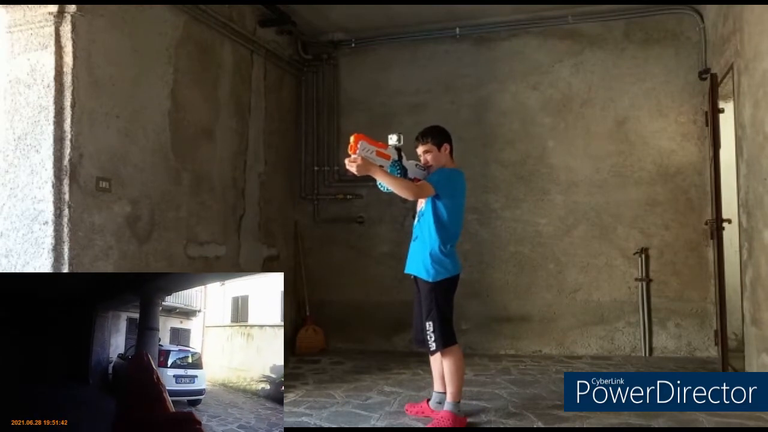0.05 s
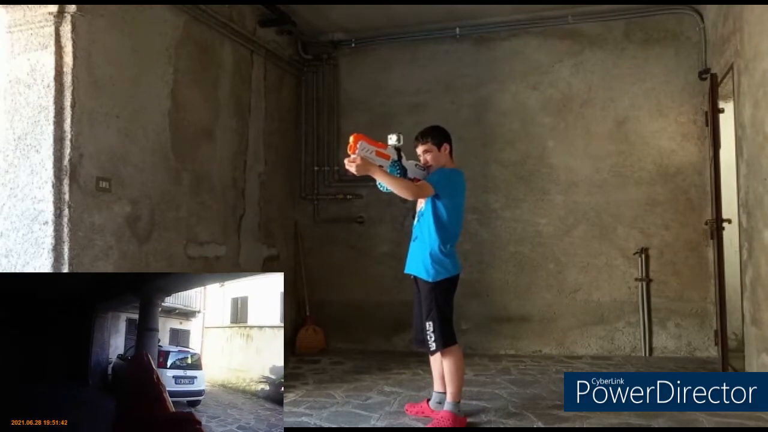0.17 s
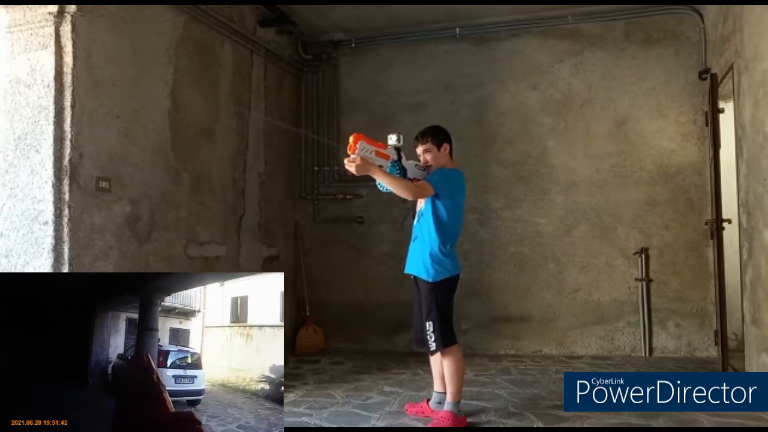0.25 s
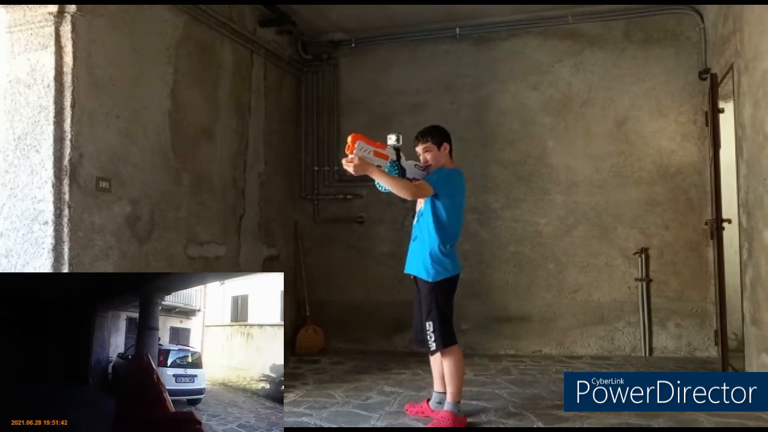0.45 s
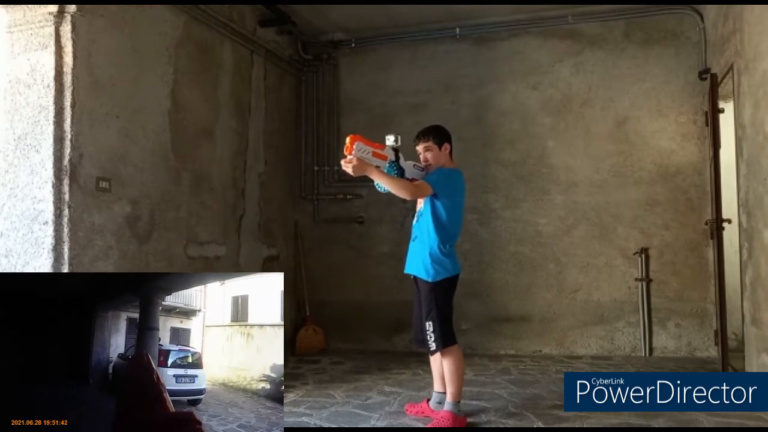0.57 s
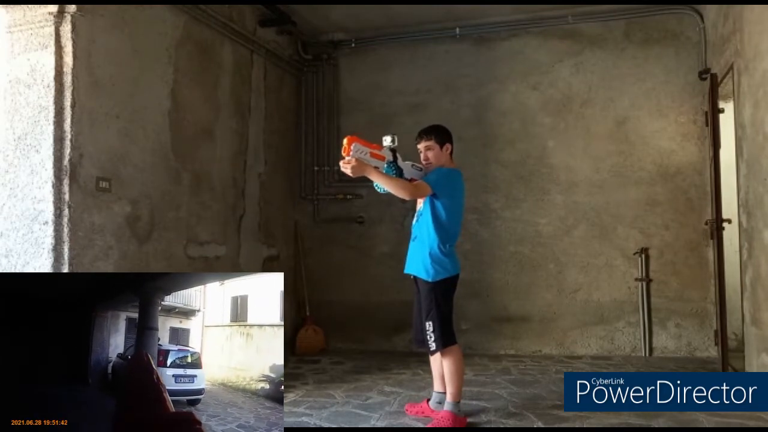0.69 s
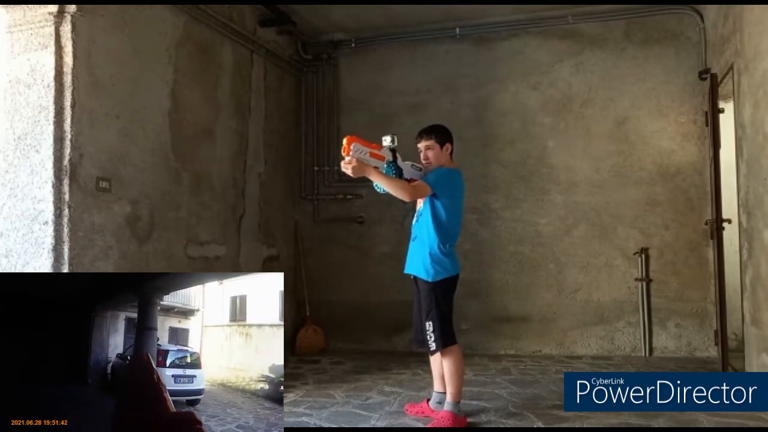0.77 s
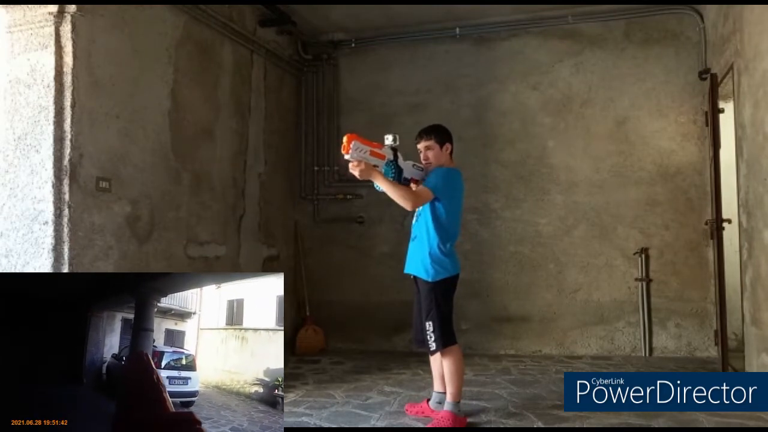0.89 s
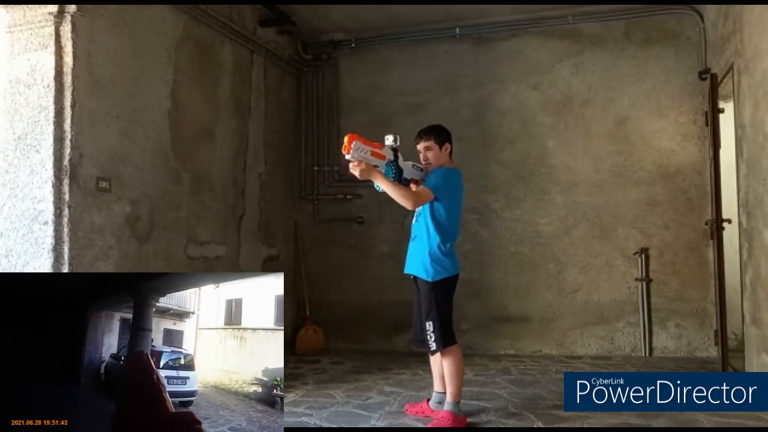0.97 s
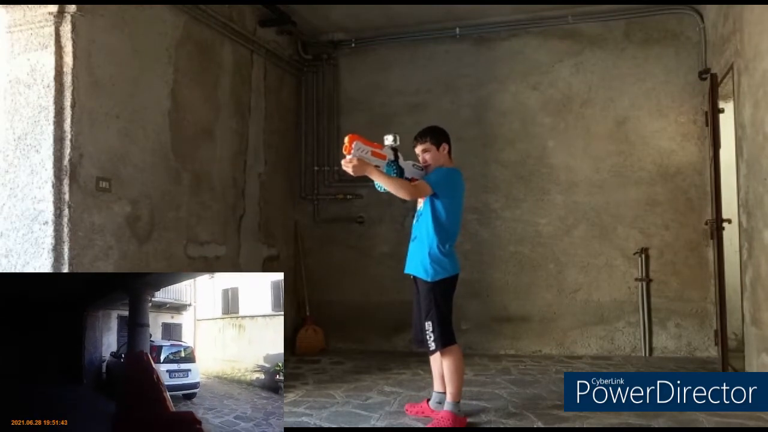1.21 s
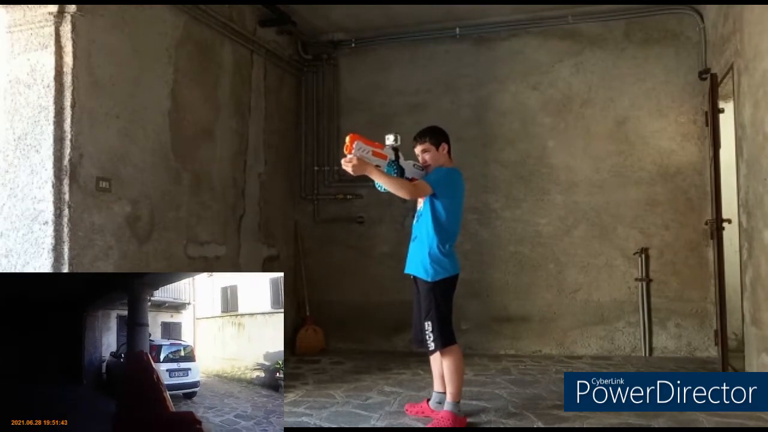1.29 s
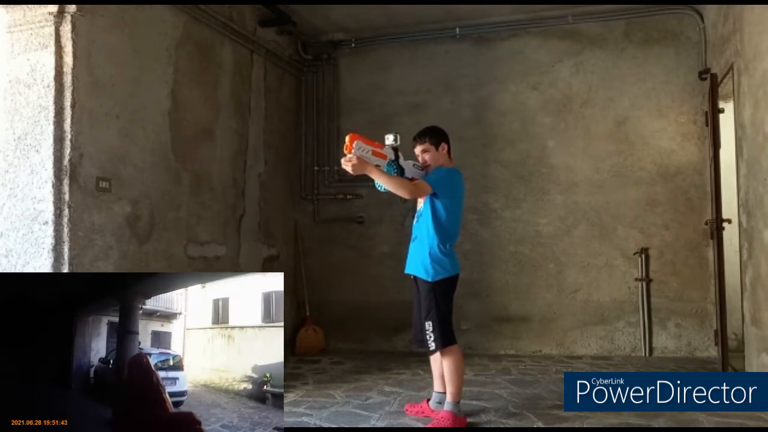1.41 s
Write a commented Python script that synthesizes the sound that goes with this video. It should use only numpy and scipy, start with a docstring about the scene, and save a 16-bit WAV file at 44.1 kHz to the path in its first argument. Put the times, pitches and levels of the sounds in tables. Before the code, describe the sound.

A toy blaster fires one loud, sharp pop at about 0.2 seconds, just after a faint trigger rub, slightly to the right. The stone garage rings on with a low boom. From 0.75 to 0.9 seconds it is cocked: a small ping, rubbing and quick plastic clacks. A lighter knock follows near 1.2 seconds. Faint outdoor rumble and machine hum lie underneath as the echo fades.

```python
"""A spring-powered toy blaster in a bare stone garage, a little right of a stereo microphone pair.
Over faint outdoor rumble and a far machine's hum, the trigger rubs and clicks; then the plunger slams
home and the barrel pops. Half a second later the toy is primed again: a latch pings, the slide rubs,
the rubber seal groans and plastic parts knock. The hard walls ring on after every sound, longest in
the bass, and the level sinks at the close."""
import sys
import numpy as np
from scipy import signal
from scipy.fft import rfft, irfft
from scipy.io import wavfile
from scipy.ndimage import uniform_filter1d

SR = 44100
rng = np.random.default_rng(int(sys.argv[2]) if len(sys.argv) > 2 else 0)


def persist_wave(psi):
    """Save psi, clipped to +-1, as 16-bit WAV."""
    counts = np.round(np.clip(psi, -1, 1) * 32767).astype(np.int16)
    wavfile.write(sys.argv[1], SR, np.atleast_2d(counts).T)


N = 63945
SHOT_S = 0.2275


def undb(db):
    """Decibels to gain."""
    return 10 ** (np.asarray(db) / 20)


def pan(left_minus_right_db):
    """Gains at the left and right microphones."""
    return undb([[left_minus_right_db / 2], [-left_minus_right_db / 2]])


def value_at(table, hz):
    """A table's value on a log-frequency axis."""
    points_hz, values = np.array(table).T
    return np.interp(np.log(np.maximum(hz, 1)), np.log(points_hz), values)


def since(start_s):
    """Seconds since a moment, for every sample."""
    return np.arange(N) / SR - start_s


def die_away(start_s, t60_s):
    """Sudden onset, then a fall of 60 dB in t60_s."""
    t = since(start_s)
    return (t >= 0) * undb(-60 * np.abs(t) / t60_s)


def unit_energy(x):
    """Scale to an energy of one."""
    return x / np.sqrt(np.sum(x ** 2) + np.finfo(float).tiny)


def resonances(peaks, hz):
    """Gain of a set of resonant peaks and dips, one between them."""
    power = 1 + sum((undb(db) ** 2 - 1) / (1 + (2 * (hz - centre_hz) / width_hz) ** 2) ** 1.5
                    for centre_hz, width_hz, db in peaks)
    return np.sqrt(power)


def colour(x, spectrum, peaks, tilt_db_per_octave=0):
    """Causal filter with the given spectrum, resonances and tilt."""
    hz = np.fft.rfftfreq(2 * N, 1 / SR)
    octaves = np.log2(np.maximum(hz, spectrum[0][0]))
    gain = undb(value_at(spectrum, hz) + tilt_db_per_octave * octaves) * resonances(peaks, hz)
    # minimum phase: nothing rings before the blow
    cepstrum = irfft(np.log(gain))
    cepstrum[1:N] *= 2
    cepstrum[N + 1:] = 0
    return irfft(rfft(x, 2 * N) * np.exp(rfft(cepstrum)))[:N]


def ring(start_s, modes):
    """Decaying modes set off by one blow."""
    t = since(start_s)
    return sum(undb(db) * unit_energy(die_away(start_s, t60_s) * np.sin(2 * np.pi * hz * t))
               for hz, db, t60_s in modes)


def rattle(start_s, decay_s):
    """A brief rattle of contacts with an even spectrum: it holds for a moment, then dies."""
    t = since(start_s)
    envelope = (t >= 0) * np.minimum(np.exp(1 - np.abs(t) / decay_s), 1)
    contacts = rng.standard_normal(N) * envelope
    for _ in range(4):
        flat_spectrum = np.exp(1j * np.angle(rfft(contacts)))
        contacts = irfft(flat_spectrum, N) * envelope ** 0.25
    return contacts


def diffuse_field():
    """Spectrum of noise from all around, alike at both microphones in the bass."""
    # likeness of left and right: frequency_hz, correlation (0-1)
    likeness = [(100, 0.94), (300, 0.89), (700, .35), (1400, 0), (12000, 0)]
    alike = np.clip(value_at(likeness, np.fft.rfftfreq(N, 1 / SR)), 0, 1)
    mid, side = rfft(rng.standard_normal((2, N)))
    return (np.sqrt(1 + alike) * mid + np.sqrt(1 - alike) * side * np.array([[1], [-1]])) / np.sqrt(2)


def outdoors(air_db=-63.5, hum_db=-68.5, hum_hz=436):
    """Faint outdoor rumble with a far machine's hum."""
    # colour of the distant air: frequency_hz, level_db
    air_spectrum = [(18, -44), (30, -19), (320, -10.5), (437, -13), (472, -4), (567, -22), (612, -22),
                    (1110, -29), (10700, -56), (15000, -40.5)]
    air = irfft(diffuse_field() * undb(value_at(air_spectrum, np.fft.rfftfreq(N, 1 / SR))), N)
    hum = np.sqrt(2) * np.sin(2 * np.pi * hum_hz * since(0))
    return undb(air_db) * air / air.std() + undb(hum_db) * hum


def garage(build_s=0.0013, wall_cutoff_hz=3000):
    """Response of the room: a few wall echoes and a dense tail whose bass lasts longest."""
    # hollow colour of the garage: centre_hz, width_hz, gain_db
    hollow = [(598, 34, 9)]
    # reverberation time: frequency_hz, t60_s
    room_t60 = [(70, 2.43), (250, 1.63), (500, 1.445), (1000, 0.87), (2000, 1.088), (4200, 0.78),
                (6000, 0.65), (9000, .5), (15000, 0.28)]
    # first reflections off the walls: delay_s, left_db, right_db
    walls = [(.0035, -18.5, -8), (.0165, -7.5, -32), (.024, -25, -28), (.030, -14, -10)]
    hz = np.fft.rfftfreq(N, 1 / SR)
    field = diffuse_field() * resonances(hollow, hz) * pan(-0.5)
    centres_hz = np.geomspace(50, 16000, 22)
    tail = 0
    for centre_hz, band_weights in zip(centres_hz, np.eye(len(centres_hz))):
        band = irfft(field * value_at(np.c_[centres_hz, band_weights], hz), N)
        tail = tail + band * die_away(0, value_at(room_t60, centre_hz))
    tail *= (1 - np.exp(-since(0) / build_s)) * np.sqrt(20 / SR)
    echoes = np.zeros((2, N))
    for delay_s, left_db, right_db in walls:
        echoes[:, int(delay_s * SR)] += undb([left_db, right_db])
    return tail + signal.sosfilt(signal.butter(1, wall_cutoff_hz, fs=SR, output="sos"), echoes)


def standing_waves():
    """The shot raises standing waves between the walls, the same at both microphones."""
    # modes of the garage: pitch_hz, level_db, t60_s
    room_modes = [(77.8, -4.5, 2.0), (127, -8.5, 2.2), (216.7, 2.5, 1.85), (257.3, 0, 2.16),
                  (558.5, 1, 3.2), (1229, 0, 1.2)]
    return ring(SHOT_S, room_modes)


def seal_groan(roughness=0.046):
    """The plunger's rubber seal shudders briefly along its tube."""
    # course of the groan: time_s, pitch_hz, level_db
    course = [(0.756, 268, -56), (.781, 279.3, -34), (.80, 293.4, -36), (0.834, 280.5, -33.5),
              (.87, 284, -52), (0.891, 272, -43)]
    times_s, hz, db = np.array(course).T
    t = since(0)
    waver = uniform_filter1d(rng.standard_normal(N), size=200)
    pitch_hz = np.interp(t, times_s, hz) * (1 + roughness * waver / waver.std())
    envelope = np.interp(t, times_s, undb(db), left=0, right=0)
    return np.sqrt(2) * np.sin(2 * np.pi * np.cumsum(pitch_hz) / SR) * envelope


def slide_rub(slips_per_s=1500):
    """Tiny slips of plastic along its rail, swelling or easing through each stroke."""
    # strokes of trigger and slide: start_s, length_s, level_db, swell_db
    strokes = [(0.125, 0.11, -74, 26), (.758, 0.034, -43, -5), (.8, 0.061, -41, -7),
               (1.008, 0.044, -49, -14), (1.122, 0.107, -52.5, 4)]
    # colour of the rubbing: frequency_hz, level_db
    rub_spectrum = [(60, -32), (300, -26), (420, 2.5), (720, 8.5), (1100, -1.5), (1700, 8), (3500, -8.5),
                    (8000, -13), (16000, -21)]
    # resonances of the rail: centre_hz, width_hz, gain_db
    rail = [(887, 80, 7.5), (1610, 69, 4.5)]
    slips = rng.standard_normal(N) * (rng.random(N) < slips_per_s / SR)
    rubbing = colour(slips, rub_spectrum, rail)
    effort = 0
    for start_s, length_s, db, swell_db in strokes:
        along = np.clip(since(start_s) / length_s, 0, 1)
        soft_ends = np.minimum(10 * along * (1 - along), 1)
        effort = effort + undb(db + swell_db * (along - 0.5)) * soft_ends
    return effort * rubbing / rubbing.std()


def latch_ping(start_s=0.7515):
    """The latch spring rings as priming begins."""
    # modes of the spring: pitch_hz, level_db, t60_s
    spring_modes = [(2754, -16, 0.14), (7570, -22.5, 0.014)]
    return ring(start_s, spring_modes)


def knock(start_s, level_db, decay_s, tilt_db_per_octave):
    """A short clatter of plastic on plastic."""
    # colour of the plastic body: frequency_hz, level_db
    plastic = [(60, -38), (280, 1.5), (420, -2.5), (720, 1), (1000, 3.5), (1600, 1.5), (2500, -3),
               (4300, -3), (6000, -9), (9000, -6.5), (16000, -11.5)]
    # resonances of the shell: centre_hz, width_hz, gain_db
    shell = [(917, 47, 6.5), (1307, 220, 1.5), (1780, 83, -7), (8040, 1500, 3)]
    clatter = colour(rattle(start_s, decay_s), plastic, shell, tilt_db_per_octave)
    return undb(level_db) * unit_energy(clatter)


def shot(level_db=12, rush_rise_s=0.0022, rush_to_crack_db=-13.5):
    """Air rushes ahead, the plunger cracks against its stop and the barrel rings."""
    # colour of the plunger's crack: frequency_hz, level_db
    crack_spectrum = [(30, -25), (50, -22), (75, -3), (200, 1), (450, -1), (750, 0.5), (1100, 7.5),
                      (1600, 0), (2100, 0), (2600, -9.5), (3500, -18), (4900, -12.5), (6000, -14.5),
                      (8500, -7.5), (12000, -14.5), (16000, -20)]
    # resonances of the barrel: centre_hz, width_hz, gain_db
    barrel = [(1053, 140, 2), (1241, 82, 10), (1506, 162, 14), (2940, 300, 7), (4200, 410, 17.5)]
    t = since(SHOT_S)
    rush = unit_energy(rng.standard_normal(N) * (t < 0) * np.exp(-np.abs(t) / rush_rise_s))
    crack = unit_energy(rattle(SHOT_S, decay_s=0.0033))
    pop = colour(crack + undb(rush_to_crack_db) * rush, crack_spectrum, barrel)
    return undb(level_db) * unit_energy(pop)


def scene():
    """Each sound of the toy reaches the two microphones directly and by way of the walls."""
    # knocks of trigger and slide: start_s, level_db, decay_s, tilt_db_per_octave, room_db
    knocks = [(.18, -45.5, 0.0095, -0.5, 7), (0.7535, -14.5, 0.0028, -2.5, 1),
              (0.8036, -21, 0.0057, -2, 18), (0.845, -13.5, 0.0024, 1, 11.5),
              (0.8649, -3, 0.0034, -0.5, 3.5), (0.8769, 1, .005, 0.68, 8), (1.1773, -12.5, .005, 0.7, 9)]
    # each sound with its room_db, the gain into the reverberation
    sounds = [(shot(), 10.5),
              (knock(SHOT_S, level_db=-3, decay_s=0.00039, tilt_db_per_octave=-0.5), 0),  # the shot's snap
              (latch_ping(), -0.5),
              (slide_rub(), 4),
              (seal_groan(), -14.5)]
    sounds += [(knock(*blow), room_db) for *blow, room_db in knocks]
    direct = sum(sound for sound, _ in sounds) * pan(-3.5)
    into_room = sum(sound * undb(room_db) for sound, room_db in sounds)
    reverberation = signal.fftconvolve(into_room[None], garage(), axes=1)[:, :N]
    return direct + reverberation + standing_waves() + outdoors()


def record(dry):
    """The recorder thins the deep bass, rounds the peaks and cuts the top; the level sinks at the close."""
    low_cut_hz, top_hz, ceiling = 30, 15800, 1.2
    fade_start_s, fade_db_per_s = 1.323, 29.5
    thinned = signal.sosfilt(signal.butter(3, low_cut_hz, "highpass", fs=SR, output="sos"), dry)
    faded = thinned * undb(-fade_db_per_s * np.maximum(since(fade_start_s), 0))
    rounded = ceiling * np.tanh(faded / ceiling)
    return signal.sosfilt(signal.ellip(10, 0.2, 80, top_hz, fs=SR, output="sos"), rounded)


dry = scene()
out = record(dry)
persist_wave(out)
```